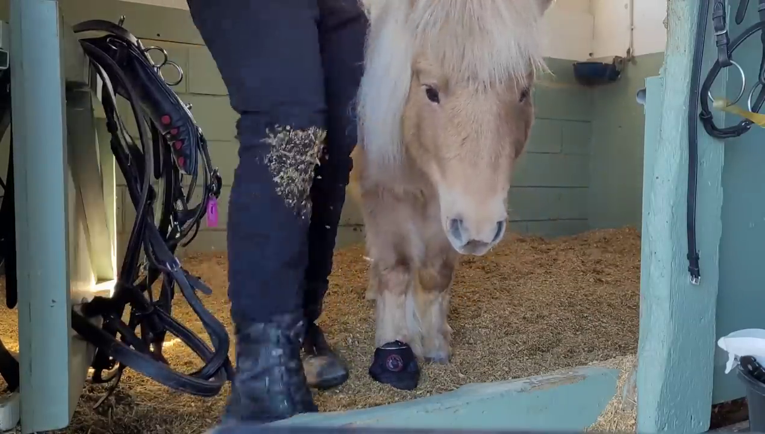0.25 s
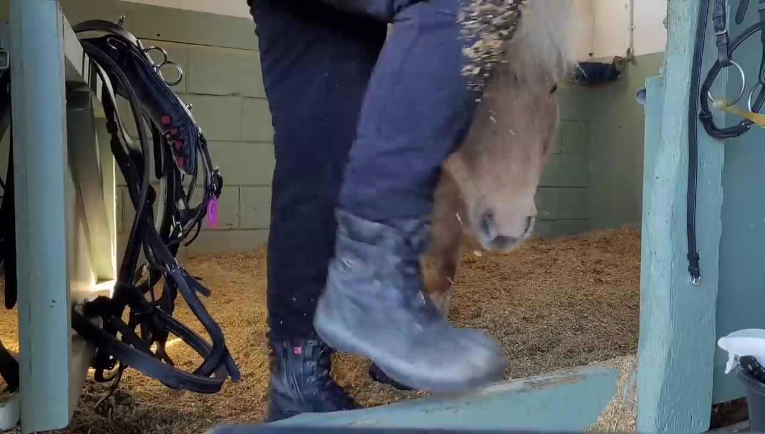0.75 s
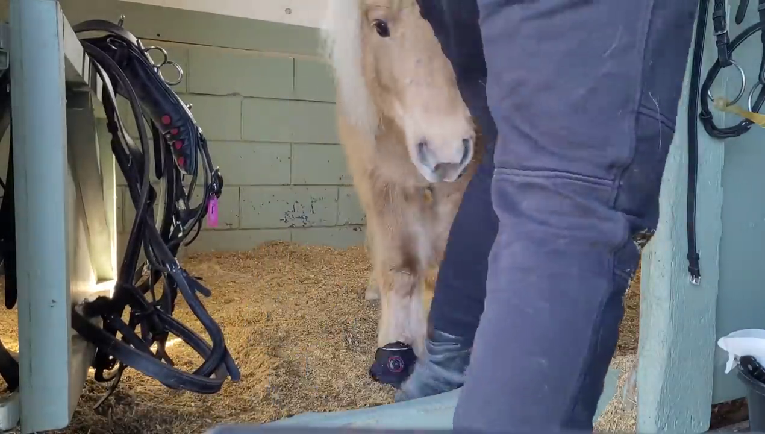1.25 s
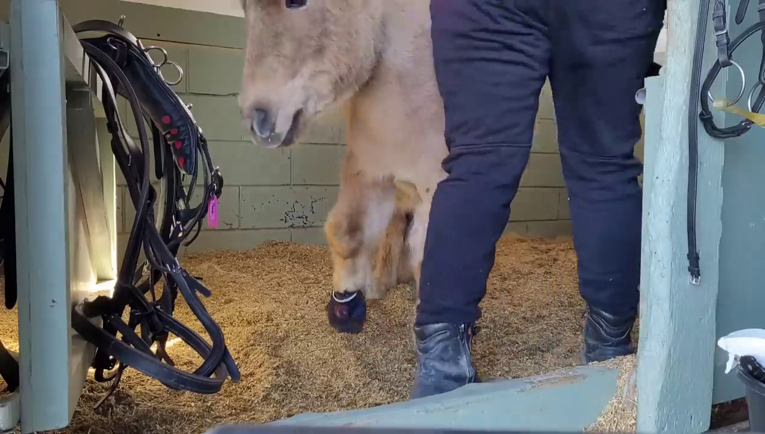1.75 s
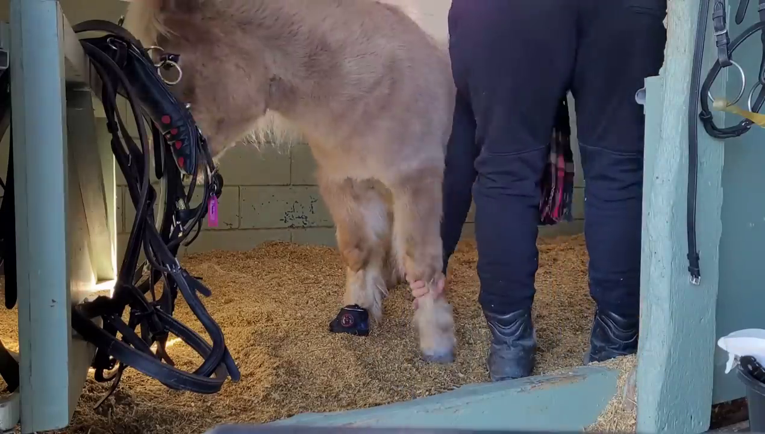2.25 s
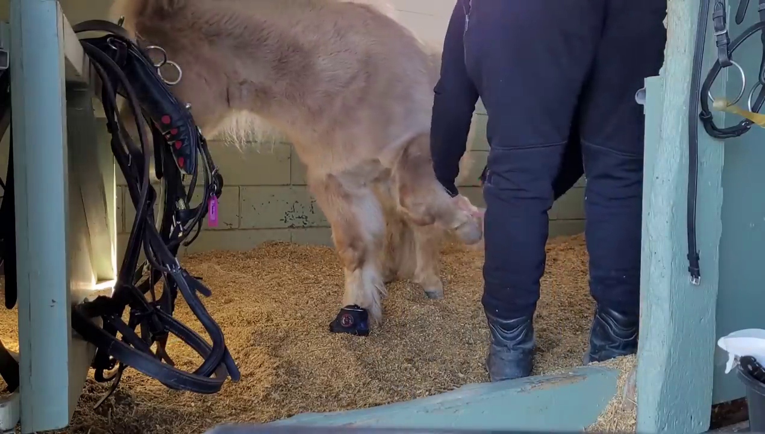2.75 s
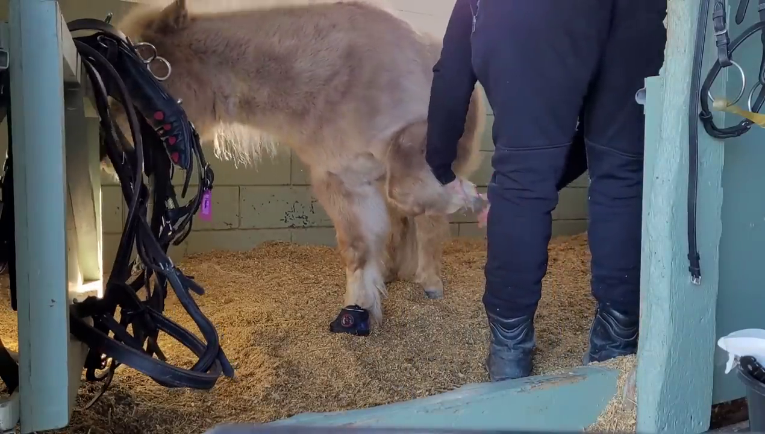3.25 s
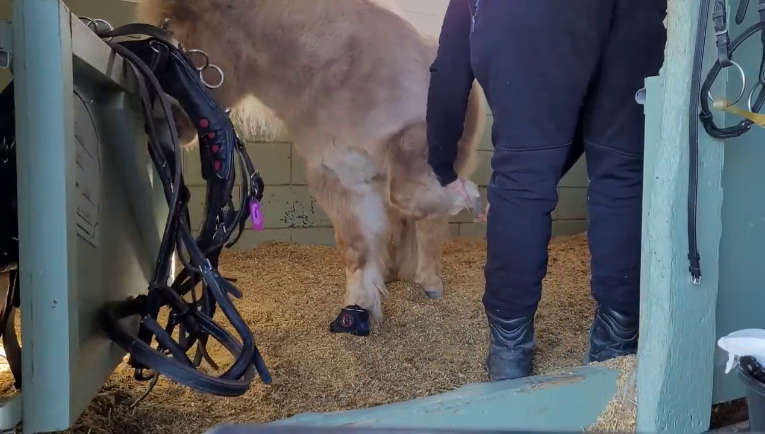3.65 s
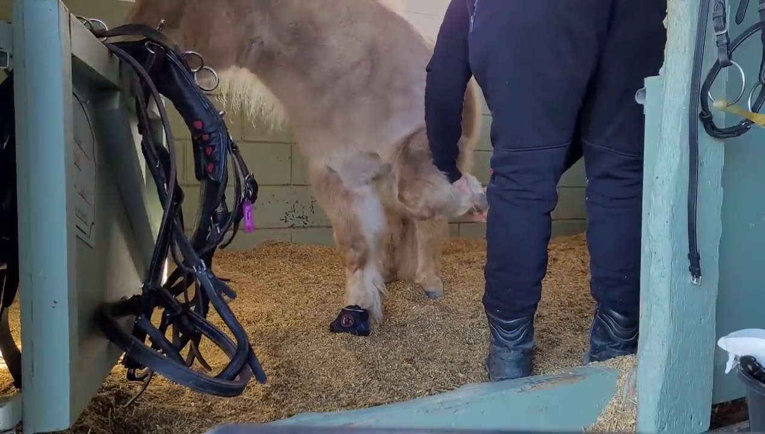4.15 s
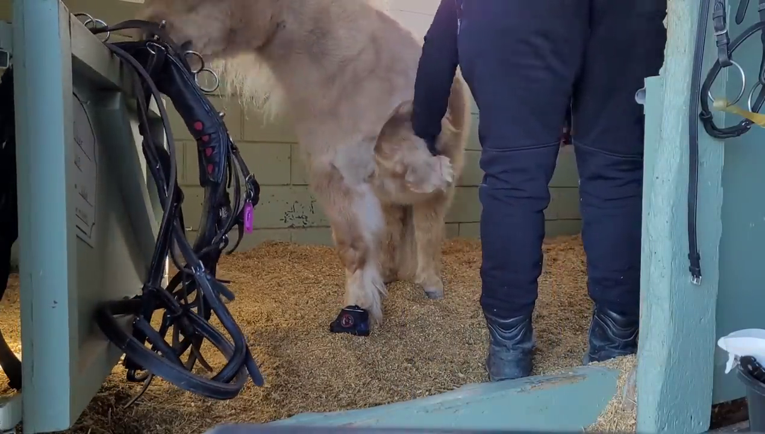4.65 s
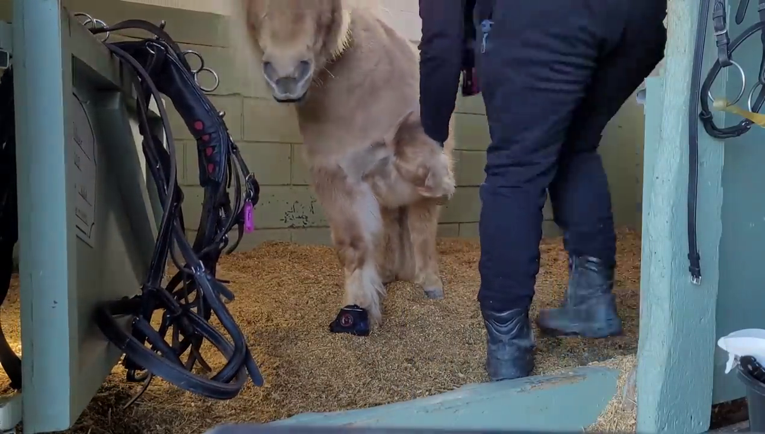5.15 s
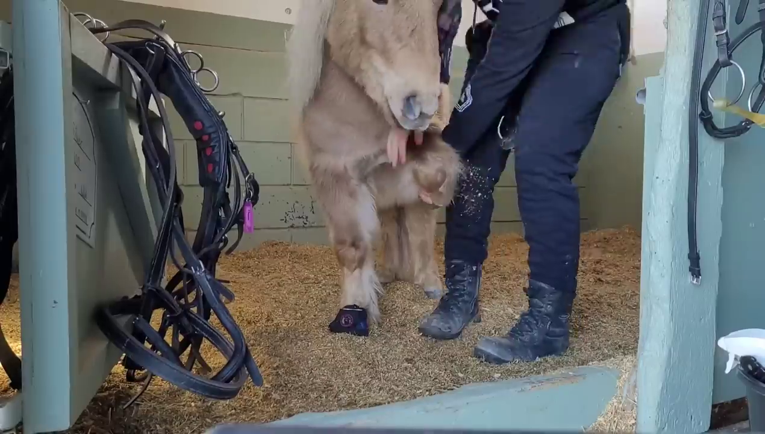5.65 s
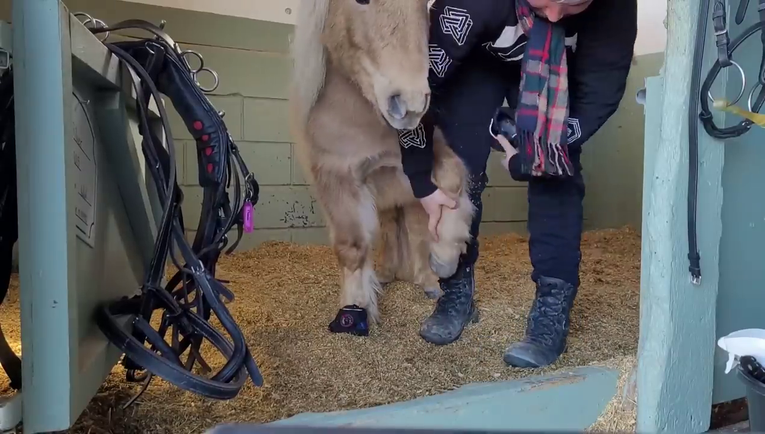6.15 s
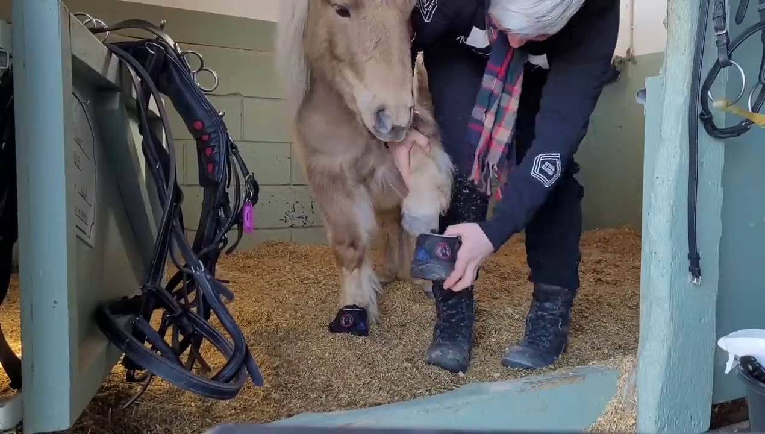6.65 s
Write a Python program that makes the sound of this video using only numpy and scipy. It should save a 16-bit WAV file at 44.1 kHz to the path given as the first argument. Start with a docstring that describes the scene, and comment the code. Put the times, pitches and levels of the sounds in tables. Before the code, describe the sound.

Inside a small block-walled stable, a distant motor hums low under dull rumble. Feet shuffle through shavings and cloth rustles as a handler walks by with a knock. A cluster of hoof thumps booms through the floor, then come quiet hand taps and brushing strokes on the hoof. One much louder, deep thud lands near the end, followed by faint taps and scuffs. Close stereo pickup, short dull echoes.

```python
"""Feet and hooves thump a stable floor and boards while a pony has its hoof boots fitted on shavings:
each thump is a soft pulse times a sine, with filtered noise exciting damped board modes, and low booms.
Hands tap and brush the hoof: resonances rung by short noise, and brief hisses. Shavings shuffle and
crackle, cloth rustles and faint whistles slide, all as shaped noise. A distant motor hums, as a wavering
sine with overtones, under a dull rumble of noise."""
import sys
import numpy as np
from scipy import signal
from scipy.io import wavfile

SR = 44100
rng = np.random.default_rng(int(sys.argv[2]) if len(sys.argv) > 2 else 0)


def ratio_of_db(decibels):
    """Turn decibels (scalar or array-like) into linear amplitude factors; 0 dB maps to 1."""
    return 10 ** (np.asarray(decibels, float) / 20)


def dump_mix(stems):
    """Bounce the given channels to the path in sys.argv[1] as a 16-bit WAV at rate SR."""
    frames = np.atleast_2d(stems).T  # one column per channel
    limited = np.clip(frames, -1, 1)  # hard clip at full scale
    pcm = np.round(limited * 32767).astype(np.int16)
    wavfile.write(sys.argv[1], SR, pcm)


N = 303849   # samples


def rms_one(x):
    """Energy normalisation: scale to unit rms."""
    return x / np.sqrt(np.mean(x ** 2) + 1e-20)


def in_time(rows):
    """Linear interpolation: table columns become sample-by-sample curves."""
    s, *columns = np.transpose(rows)
    return [np.interp(np.arange(N) / SR, s, c) for c in columns]


def at_hz(points, hz):
    """Logarithmic frequency scale: read a spectrum by interpolating along it."""
    f, value = np.transpose(points)
    return np.interp(np.log(hz), np.log(f), value)


def band(x, low_hz, high_hz):
    """Band limitation: a Butterworth band-pass."""
    edges = [low_hz, min(high_hz, .45 * SR)]
    return signal.sosfilt(signal.butter(2, edges, "band", fs=SR, output="sos"), x)


def pan(db):
    """Interaural level difference: left and right gains, left louder when positive."""
    return ratio_of_db([[db / 2], [-db / 2]])


def drift(rate_hz):
    """Low-pass random process: a slow wander of unit rms, drawn at every 40th sample."""
    r = np.exp(-80 * np.pi * rate_hz / SR)
    white = rng.standard_normal(N // 40 + 2002)
    slow = signal.lfilter([1], [1, -2 * r, r * r], white)[2000:]   # drop the settling part
    return np.interp(np.arange(N) / 40, np.arange(len(slow)), rms_one(slow))


def ring(push, hz, t60):
    """Damped resonance: a unit click starts a sine of height 1 that falls 60 dB in t60 seconds."""
    r, w = ratio_of_db(-60 / (t60 * SR)), 2 * np.pi * hz / SR
    return signal.lfilter([0, np.sin(w)], [1, -2 * r * np.cos(w), r * r], push + 1e-18)


def add(out, s, sound):
    """Superposition: mix a short sound in at s seconds."""
    i = max(int(s * SR), 0)
    out[:, i:i + sound.shape[-1]] += sound[..., :N - i]


def swell(t, rise_s, fall_s):
    """Exponential relaxation: a smooth rise and an exponential fall, with peak 1."""
    shape = (1 - np.exp(-t / rise_s)) ** 2 * np.exp(-t / fall_s)
    return shape / shape.max()


def two_ports(noise, hz):
    """Spatial coherence: shared and separate noises, mixed to the left-right likeness at this pitch."""
    alike_below_hz = 880
    alike = min((alike_below_hz / hz) ** 2.0, 1)
    return np.sqrt(alike) * noise[0] + np.sqrt(1 - alike) * noise[1:]


# left-right likeness of the diffuse noises: f/Hz, correlation [-1 to 1]
COHERENCE = [(30, 0.096), (70, 0.42), (250, 0.98), (500, 0.96), (1000, 0.29), (3000, 0), (15000, 0)]


def banded_noise(spectrum, patchy_db):
    """Spatial coherence by band: half-octave stereo noises that flicker together and apart; rms 1."""
    out, together = 0, drift(10.0)
    lowest, highest = spectrum[0][0], spectrum[-1][0]
    edges = lowest * 2 ** np.arange(0, np.log2(highest / lowest) + .5, .5)
    white = rng.standard_normal((2, 2, N))
    for k, (low, high) in enumerate(zip(edges, edges[1:])):
        mid, side = band(white[k % 2], low, high)   # neighbouring bands use separate noise
        hz = np.sqrt(low * high)
        alike = np.clip(at_hz(COHERENCE, hz), -1, 1)
        flicker_db = patchy_db * (together + 3.4 * drift(12.0))
        gain = ratio_of_db(at_hz(spectrum, hz) + flicker_db)
        out = out + gain * (np.sqrt(1 + alike) * mid + np.sqrt(1 - alike) * side * [[1], [-1]])
    return rms_one(out)


def across(x):
    """Interaural time difference: airborne sound reaches the right a little later."""
    lag = round(.00032 * SR)   # s to samples
    return np.array([x[0], np.concatenate([x[1, :lag], x[1, :N - lag]])])


def stall(x):
    """Diffuse reverberation: dull echoes of the block walls, different in each ear."""
    t60_s, first_echo_s = 0.089, .004
    t = np.arange(int(.3 * SR)) / SR
    tail = band(rng.standard_normal((2, len(t))), 460, 2800) * ratio_of_db(-60 * t / t60_s) * (t > first_echo_s)
    tail /= np.sqrt(np.sum(tail ** 2, axis=1, keepdims=True))   # unit energy
    return signal.fftconvolve(x * np.ones((2, 1)), tail, axes=1)[:, :N]


# dull rumble: f/Hz, relative spectral density/dB
RUMBLE_SPECTRUM = [(12, -28), (20, -15), (48, 1.5), (75, -2.5), (113, -8.5), (317, -14.5), (552, -21),
                   (718, -35.5), (800, -36), (1040, -55), (1760, -120)]


def rumble():
    """Broadband noise source: a rumble whose bands flicker slightly."""
    return ratio_of_db(-48.5) * banded_noise(RUMBLE_SPECTRUM, patchy_db=.6)


# motor hum, its pitch sagging early: t/s, fundamental f/Hz, level/dB
HUM_COURSE = [(0, 70.4, -48.5), (.4, 63.25, -44.5), (.6, 68.02, -48), (1.9, 68.25, -48.5),
              (2.7, 68.1, -47.5), (4.4, 66.56, -48.5), (6.89, 67.17, -46.5)]
# overtones: multiple of the fundamental [1], level/dB re fundamental
HUM_OVERTONES = [(2, -10), (3, -17), (4, -17), (5, -17)]


def hum():
    """Harmonic series: a far motor's wavering sine and overtones, in step so that crests are peaked."""
    hz, level_db = in_time(HUM_COURSE)
    turn = 2 * np.pi * np.cumsum(hz + 0.724 * drift(2.98)) / SR
    first = ratio_of_db(level_db + 1.5 * drift(5.8)) * np.sin(turn)
    overtones = 0
    for k, db in HUM_OVERTONES:
        overtones = overtones + ratio_of_db(level_db + db + 1.4 * drift(3.6)) * np.cos(k * (turn - np.pi / 2))
    return np.sqrt(2) * (first + overtones)   # rms to peak


# far, blurred whistles, perhaps a bird outside: t/s, length/s, first f/Hz, last f/Hz, level/dB
WHISTLE_GLIDES = [(1.49, 0.17, 4080, 3740, -83), (1.558, 0.28, 3680, 3390, -73.5),
                  (1.76, 0.14, 3380, 2980, -77.5), (3.22, .08, 3950, 3920, -80),
                  (3.31, 0.056, 3950, 4000, -86), (4.278, 0.34, 3580, 3480, -73.5)]


def whistles():
    """Narrow-band modulation: air noise slides a little in pitch, swelling and fading."""
    out = np.zeros((1, N))
    smooth = signal.butter(2, 210, fs=SR, output="sos")   # Hz to either side of the pitch
    for s, length, first_hz, last_hz, db in WHISTLE_GLIDES:
        a, b = signal.sosfilt(smooth, rng.standard_normal((2, SR // 2)))
        along = np.minimum(np.arange(SR // 2) / (length * SR), 1)
        turn = 2 * np.pi * np.cumsum(first_hz + (last_hz - first_hz) * along) / SR
        air = rms_one(a * np.cos(turn) + b * np.sin(turn))
        add(out, s, ratio_of_db(db) * np.sin(np.pi * along) ** 0.64 * air)
    return out * pan(4)


# colour of cloth rustle: f/Hz, relative spectral density/dB
RUSTLE_SPECTRUM = [(1290, -44.5), (2200, -11), (3470, -3), (5860, -12.5), (6470, 2), (9020, -8),
                   (15100, -7), (16000, -4.5)]
# cloth rustling, strongest while the handler walks past: t/s, level/dB
RUSTLE_COURSE = [(0, -70.5), (.45, -73), (.58, -78.5), (.66, -68), (.95, -71.5), (1.05, -79.5),
                 (2.3, -82.5), (2.8, -78), (4.5, -82.5), (5.2, -82.5), (5.5, -78), (6.89, -82)]


def rustle():
    """Amplitude-modulated noise: cloth folds make the hiss grainy."""
    (level_db,) = in_time(RUSTLE_COURSE)
    return ratio_of_db(level_db) * banded_noise(RUSTLE_SPECTRUM, patchy_db=.8) * ratio_of_db(1.8 * drift(45))


def crackle():
    """Poisson impulse process: shavings snap underfoot as small dull grains of uneven size."""
    snaps_per_s = 25
    snaps = rng.random(N) < snaps_per_s / SR
    sizes = ratio_of_db(4.8 * np.minimum(rng.exponential(1, N), 3.0))
    decay = np.exp(-np.arange(600) / (0.0031 * SR))
    grains = np.convolve(snaps * sizes, decay)[:N] * rng.standard_normal(N)
    return ratio_of_db(-12) * rms_one(band(band(grains, 500, 1800), 400, 2000))


# colour of feet in bedding: f/Hz, relative spectral density/dB
SHUFFLE_SPECTRUM = [(350, -31.5), (600, -0.5), (1300, -6), (2000, -13), (2800, -21)]
# feet shuffling in the bedding: t/s, level/dB
SHUFFLE_COURSE = [(0, -63.5), (.55, -65.5), (.68, -60), (.95, -58.5), (1.07, -64), (2.6, -65), (3.3, -70.5),
                  (5.2, -73.5), (5.45, -66.5), (5.9, -64), (6.3, -72), (6.89, -69.5)]


def shuffle():
    """Friction noise: feet rush through the bedding, with crackle under a steep treble edge."""
    (level_db,) = in_time(SHUFFLE_COURSE)
    rush = ratio_of_db(level_db) * (banded_noise(SHUFFLE_SPECTRUM, patchy_db=.6) + crackle())
    return signal.sosfilt(signal.butter(6, 2300, fs=SR, output="sos"), rush)


# brush strokes and cloth scuffs: t/s (starts 8 ms sooner), level/dB, low part level/dB re hiss,
# nominal length/s
STROKES = [(0.179, -58, -14, 0.0084), (0.784, -62.5, -21, 0.026), (0.913, -68.5, 6, 0.053),
           (1.3394, -62, 1, 0.051), (1.795, -76.5, 13.5, 0.031), (1.816, -61.5, -29, 0.028),
           (2.598, -58.5, -2, 0.0094), (2.836, -65.5, -13, 0.03), (3.114, -63, -5, 0.018),
           (3.492, -68, 0, 0.022), (3.642, -63, -0.5, 0.028), (3.766, -66, -5, 0.024),
           (3.884, -60.5, -37, 0.017), (3.961, -64, -1.5, 0.038), (4.091, -64, -5, 0.02),
           (4.186, -65, -5, 0.01983), (4.302, -67.5, -2, 0.034), (5.384, -67.5, -17, 0.044),
           (5.946, -76.5, 8, 0.0345), (6.069, -75.5, 9, 0.023), (6.251, -60, -4, 0.02),
           (6.298, -64, 1, 0.023), (6.525, -67.5, -4, 0.0362), (6.764, -63.5, -31, 0.027),
           (6.833, -66.5, 0.5, 0.038)]


def scuffs():
    """Friction noise: each stroke is a brief wide hiss, partly unlike in the two ears."""
    out, t = np.zeros((2, N)), np.arange(int(.2 * SR)) / SR
    for s, peak_db, low_db, length in STROKES:
        noise = rng.standard_normal((3, len(t)))
        noise = noise[:2] + 0.086 * noise[2]
        along = np.minimum(t / (1.9 * max(length, .004)), 1)
        stroke = np.sin(np.pi * along ** 0.54) ** 2 + 0.19 * swell(t, 0.022, 0.036)
        hiss = rms_one(band(noise, 4530, 19000)) + ratio_of_db(low_db) * rms_one(band(noise, 970, 7100))
        add(out, s - .008, ratio_of_db(peak_db - 6.5) * stroke * hiss)   # allows for hiss peaks over rms
    return out


# taps on hoof and boot: t/s, ring level/dB, ring f/Hz, body level/dB re ring, crack level/dB re ring,
# crackle decay/s (at least 2 ms is used)
HOOF_TAPS = [(0.538, -54.5, 1860, 6.5, -12, 0.0062), (0.856, -32.5, 685, 2.5, -4.5, 0.0035),
             (1.173, -51.5, 10290, -30, -16, 0.0032), (2.895, -53.5, 1950, 6, -8, 0.0063),
             (2.906, -43, 1600, 3, -11, 0.012), (2.907, -70, 2920, -9, -5, 0.0053),
             (3.076, -55, 814, 4, -8.5, 0.0041), (3.114, -57, 13550, -20, -20, .01),
             (4.357, -58.5, 7100, -25, 0, 0.0018), (4.388, -47.5, 850, 8.5, 3, 0.0049),
             (4.395, -45.5, 2360, 9, 0.5, 0.0097), (4.475, -38, 830, 3.5, 6.5, 0.0018),
             (4.481, -48, 2290, -14, -4, 0.008), (4.547, -50.5, 2900, 8.5, 1, 0.014),
             (5.256, -67, 1863, -5, -9, 0.0041), (5.28, -52.5, 1800, 3, -12, 0.0084),
             (5.288, -66, 4000, 3, -10, 0.0044), (5.514, -53.5, 1230, -12, -14, 0.0041),
             (5.769, -63, 796, 15, -10, 0.0087), (5.78, -65.5, 3020, -11, 5.5, 0.031),
             (6.024, -54, 950, 8.5, -18, 0.0024), (6.249, -51.5, 897, -12, -17, 0.0075),
             (6.297, -59, 1030, 6, -12, 0.01), (6.55, -65, 1200, 18.5, -6, 0.021),
             (6.694, -63, 800, 10, -16, 0.0036)]


def taps():
    """Forced resonance: a noise crackle rings one short mode over a wide crack and a small body thud."""
    out, t = np.zeros((2, N)), np.arange(int(.12 * SR)) / SR
    for s, peak_db, hz, body_db, crack_db, length in HOOF_TAPS:
        length = max(length, .002)
        # longer crackles build up slower, all stop short
        stop = np.cos(np.pi / 2 * np.minimum(t / (3.9 * length), 1))
        noise = rng.standard_normal((3, len(t))) * swell(t, 0.26 * length, length) * stop
        push = band(two_ports(noise, hz), .8 * hz, 1.25 * hz)
        note = ring(push, hz, 10 / hz)   # falls 60 dB in ten cycles
        wide = two_ports(noise, 2300)
        crack = band(wide, 1190, 3640) + 0.17 * band(wide, 3600, 6800)
        body = band(noise[0], 194, 556)
        tap = note / abs(note).max()
        tap = tap + ratio_of_db(crack_db) * crack / abs(crack).max()
        tap = tap + ratio_of_db(body_db) * pan(-4) * body / abs(body).max()
        add(out, s, ratio_of_db(peak_db) * tap)
    return out


def jolt():
    """Near-field push: a short swing almost only on the left, then a fainter one that lingers."""
    start_s, level_db, hz, length_s, pan_db = 4.596, -28.5, 124, 0.018, 25
    after_db, after_hz, after_t60_s = -15.5, 94.6, 0.065
    out, t = np.zeros((2, N)), np.arange(int(.3 * SR)) / SR
    push = np.sin(np.pi * np.minimum(t / length_s, 1)) ** 3.3 * np.sin(2 * np.pi * hz * t)
    linger = swell(t, 0.0049, after_t60_s / np.log(1000)) * np.sin(2 * np.pi * after_hz * t)
    gain = ratio_of_db(level_db) * pan(pan_db)
    add(out, start_s, gain * push)
    add(out, start_s + length_s, gain * ratio_of_db(after_db) * linger)
    return out


# low booms of floor and partition: t/s, level/dB, f/Hz, decay by 60 dB/s
FLOOR_BOOMS = [(0.859, -26, 125, 0.063), (1.89, -29, 118, 0.17), (1.917, -32.5, 76.4, 0.29),
               (2.352, -25.5, 74.7, 0.47), (2.403, -28.5, 128, 0.091), (2.512, -32, 69.5, 0.14),
               (5.042, -16, 108.7, 0.19), (5.063, -16.5, 77.6, 0.26)]


def booms():
    """Damped modal vibration: floor and partition swing deep and clean after a heavy landing."""
    out, t = np.zeros((2, N)), np.arange(int(.5 * SR)) / SR
    for s, peak_db, hz, t60 in FLOOR_BOOMS:
        rise_s = 0.22 / hz   # cycles to s
        swing = swell(t, rise_s, t60 / np.log(1000)) * np.sin(2 * np.pi * hz * t)
        add(out, s, ratio_of_db(peak_db) * pan(-3) * swing)
    return out


# landings of feet and hooves: t/s (starts 5 ms sooner), knock level/dB, knock f/Hz,
# boards level/dB re knock, grit level/dB re knock
LANDINGS = [(0.861, -26.5, 238, -3, -21), (1.884, -23.5, 273, -1.5, -38), (1.9, -25, 351.5, -4.5, -41.5),
            (1.924, -39.5, 286, -5, -32), (2.35, -24, 238, -5.5, -59), (2.4, -36.5, 290, -0.5, -39),
            (2.469, -36, 307, 2, -52), (2.533, -47, 446.6, 11, -21.5), (4.672, -45, 325, -9, -37),
            (4.855, -46, 241, -12, -51.5), (5.039, -13, 300, -0.5, -40.5), (5.046, -16.5, 235, -7, -39),
            (5.076, -27, 250, -7, -43), (6.625, -46, 300, -10, -50), (6.741, -43.5, 280.3, -5, -50)]
# what the boards ring with: f/Hz, relative level/dB, decay by 60 dB/s
BOARD_MODES = [(202, -1, 0.11), (250, -1, 0.093), (300, -6, 0.12), (346, -3, 0.11), (425, 6.5, 0.045),
               (473, -4, 0.077), (570, -20.5, 0.033), (806, -15.5, 0.064), (1040, -39, 0.025),
               (1270, -27, 0.058)]


def thumps():
    """Impact excitation: weight on a soft contact gives a knock of a few cycles, shaken boards and grit."""
    contact_s, boards_pan_db = 0.026, -5   # the boards ring further to the right than the knock
    out, t = np.zeros((2, N)), np.arange(int(.3 * SR)) / SR
    press = np.sin(np.pi * np.minimum(t / contact_s, 1)) ** 0.98
    for s, peak_db, hz, boards_db, grit_db in LANDINGS:
        noise = rng.standard_normal((3, len(t)))
        loose = two_ports(noise, 2000)
        knock = press * np.sin(2 * np.pi * hz * t)
        shake = band(press * noise[0], 150, 1100)   # uneven, padded contact
        boards = sum(ratio_of_db(db) * ring(shake, f, t60) for f, db, t60 in BOARD_MODES)
        boards = pan(boards_pan_db) * boards / abs(boards).max()
        grit = rms_one(band(loose, 880, 2600) + 0.18 * band(loose, 2600, 5400))
        grit = (press + 0.42 * swell(t, 0.0036, 0.012)) * grit
        thump = knock + ratio_of_db(boards_db) * boards + ratio_of_db(grit_db) * grit
        add(out, s - .005, ratio_of_db(peak_db) * thump)
    return out


def scene():
    """Superposition: blows through the floor shake both sides at once, airborne layers lag on the right."""
    blows = thumps() * pan(-1)
    light = taps() * pan(1.5) + whistles()
    low = (hum() + rumble()) * pan(-1)
    soft = shuffle() + rustle()
    airborne = scuffs() * pan(3) + low + soft
    echoes = ratio_of_db(-13.5) * stall(blows + light)
    return blows + light + booms() + jolt() + echoes + across(airborne)


def low_pass(x):
    """Removes everything above the highest recorded frequency."""
    return signal.sosfilt(signal.butter(12, 15850, fs=SR, output="sos"), x)


def record(dry):
    """Linear superposition is complete here: the finished stereo mix is handed on."""
    return low_pass(dry)


dry = scene()
out = record(dry)
dump_mix(out)
```